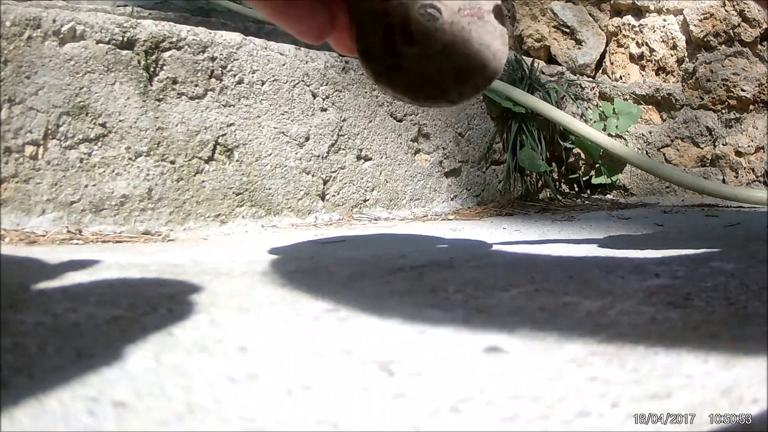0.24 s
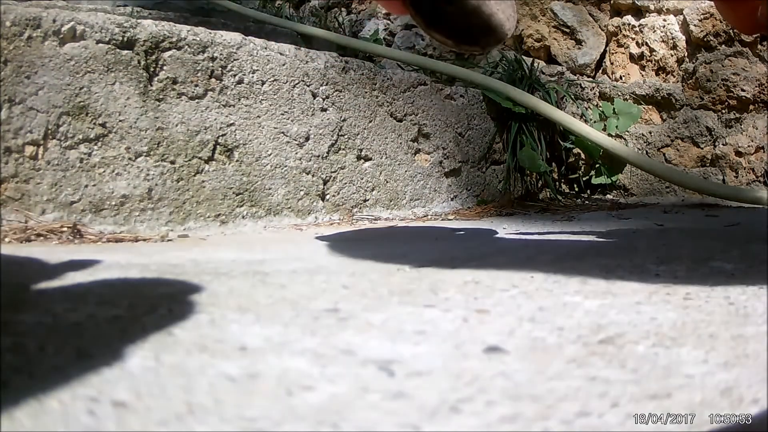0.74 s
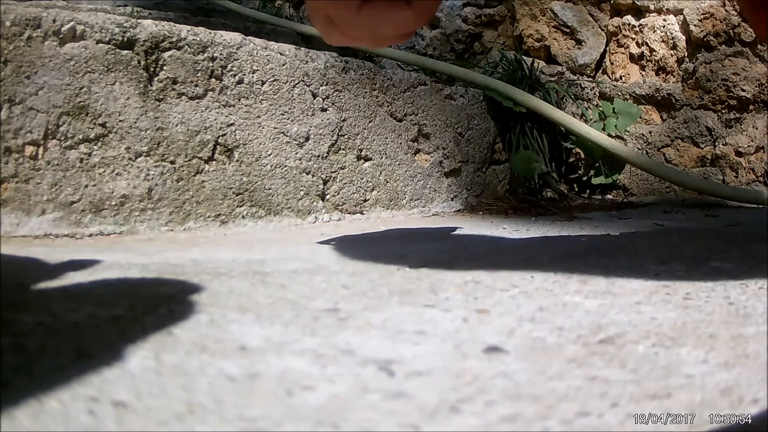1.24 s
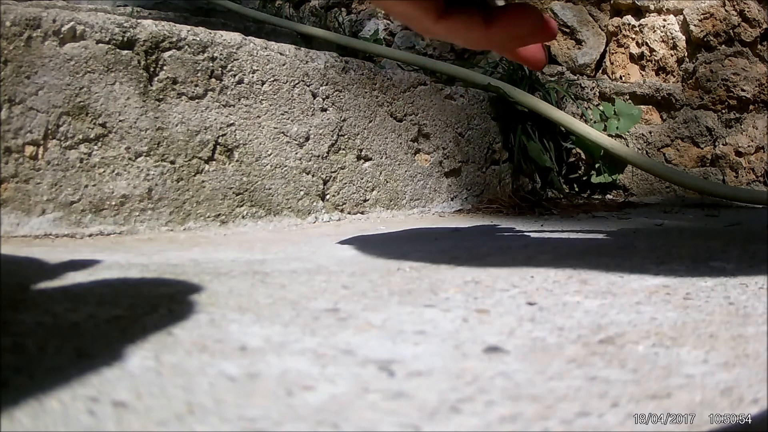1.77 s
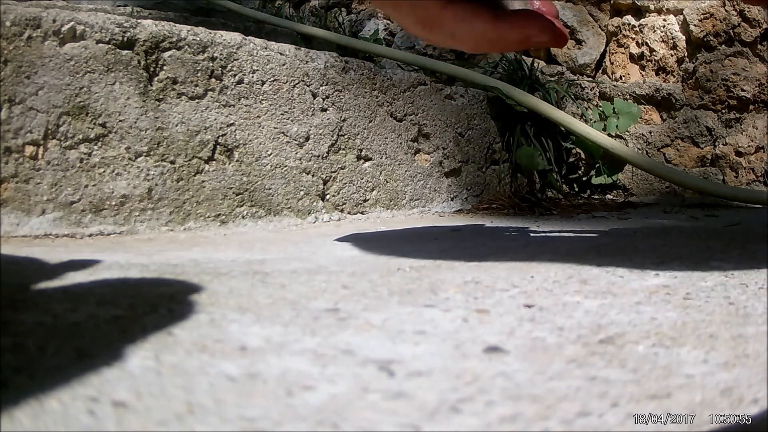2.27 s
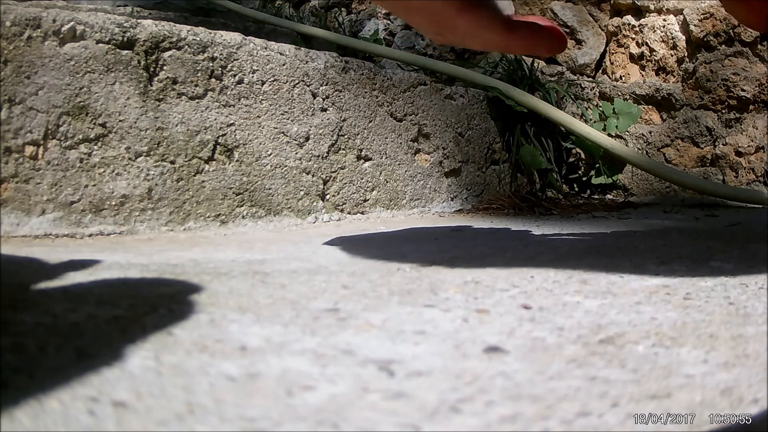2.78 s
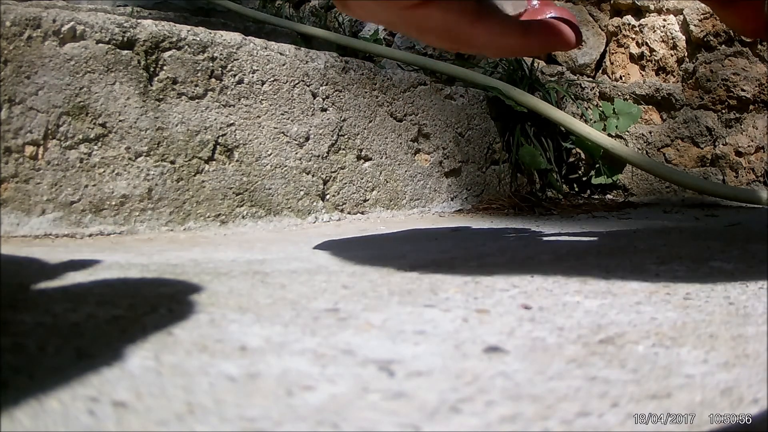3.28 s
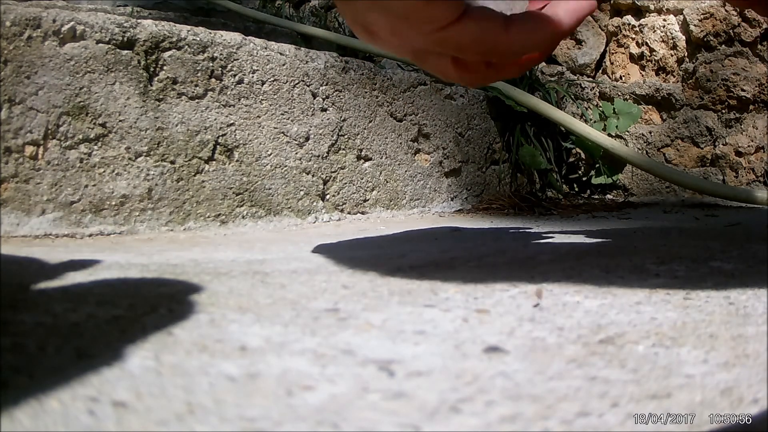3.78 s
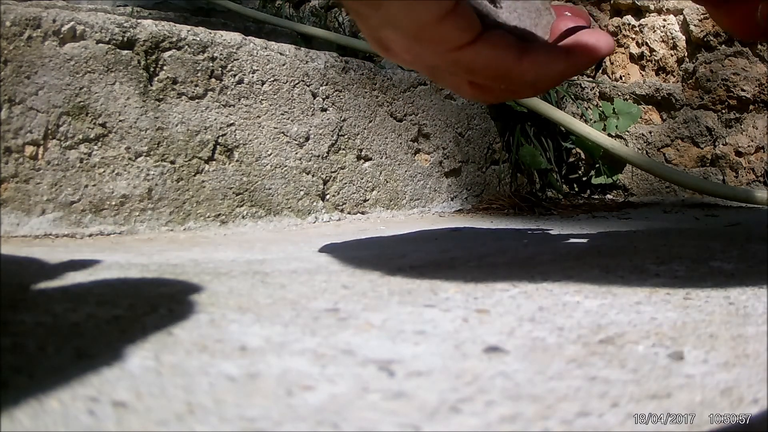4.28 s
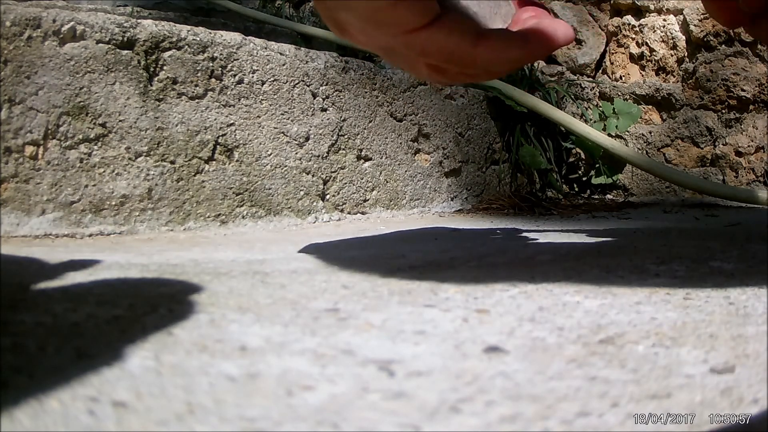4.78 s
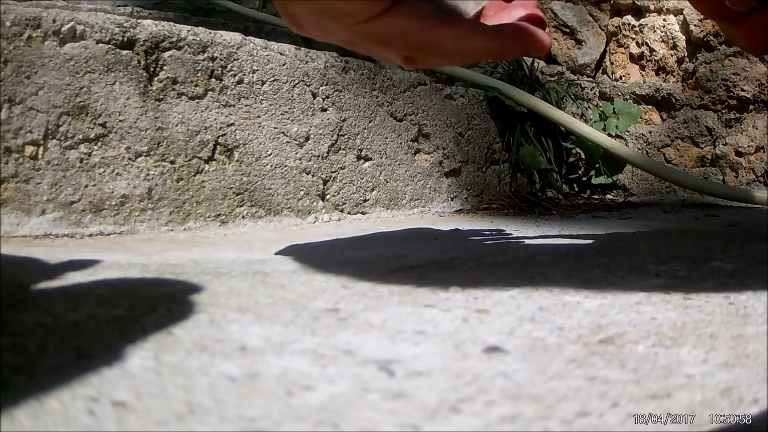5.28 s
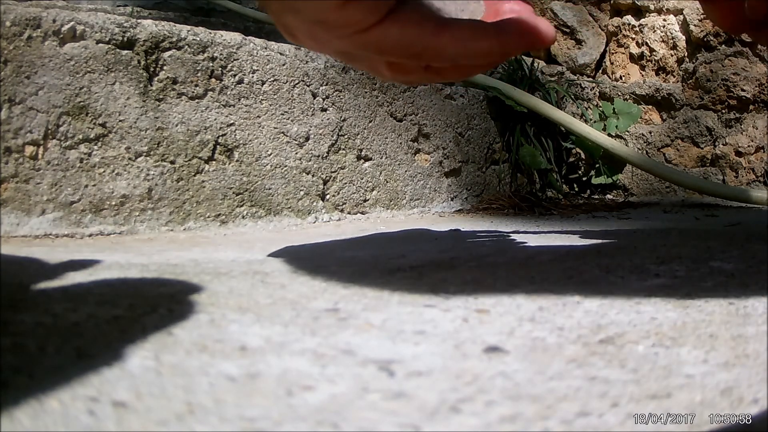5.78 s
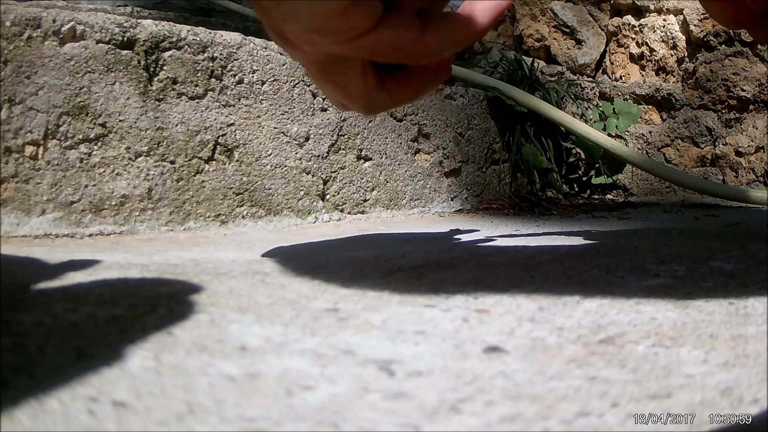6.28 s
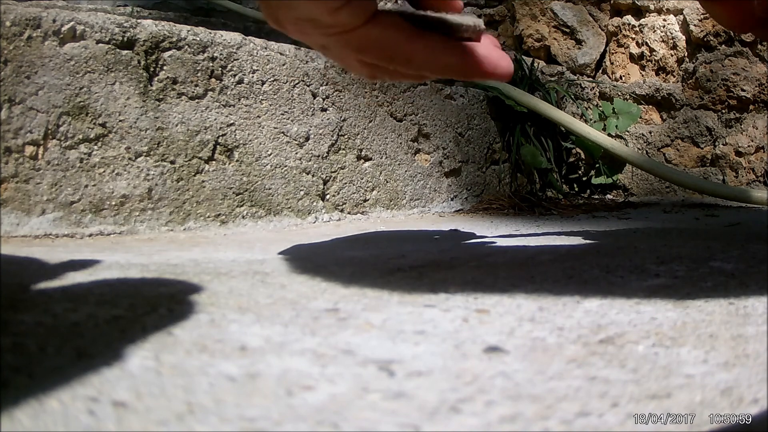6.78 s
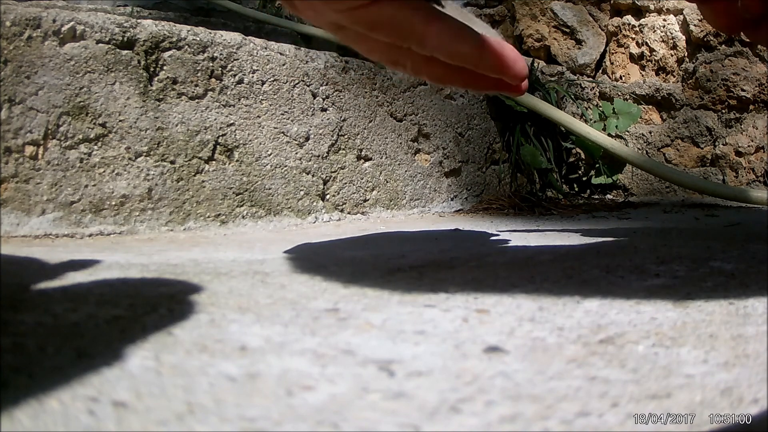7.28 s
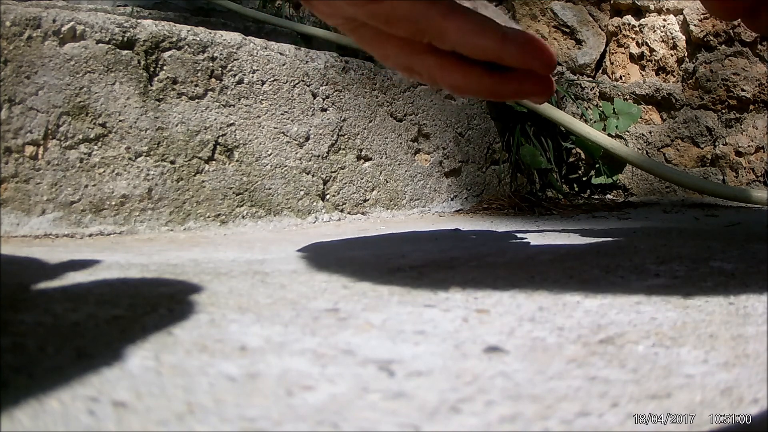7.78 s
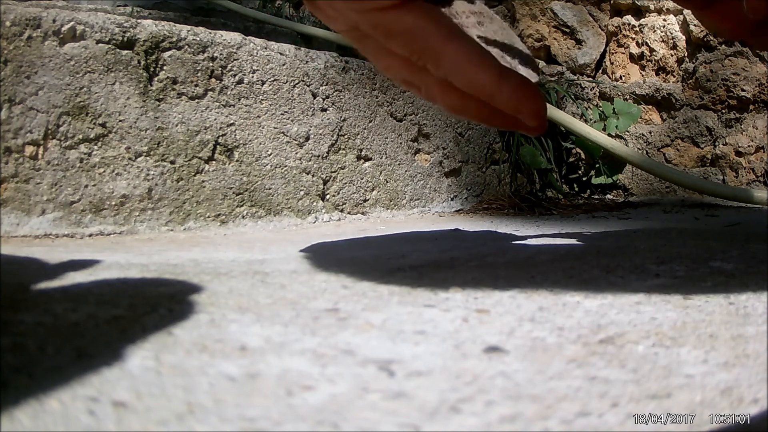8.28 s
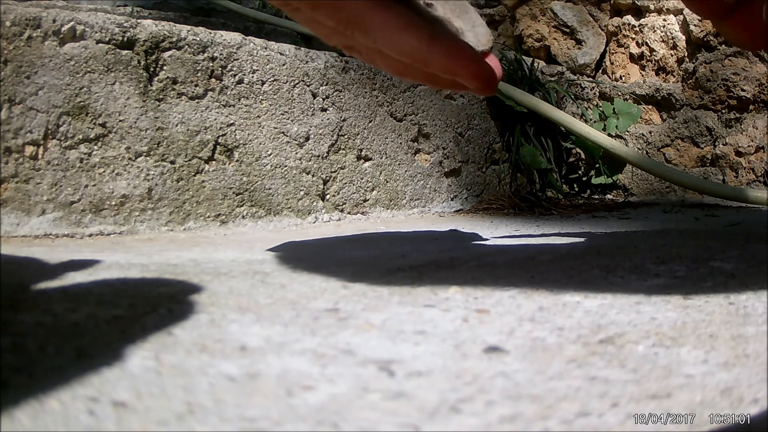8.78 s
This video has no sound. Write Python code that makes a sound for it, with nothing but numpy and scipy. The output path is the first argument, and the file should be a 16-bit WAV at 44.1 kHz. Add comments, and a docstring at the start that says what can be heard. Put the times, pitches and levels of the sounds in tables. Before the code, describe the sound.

Compressed air hisses through a hollow filter close up, surging in short rough bursts, with one brief pause and a tiny squeak.

```python
"""Air gun on a filter in a concrete yard

Outdoors, close to a small camera microphone, compressed air blows dust from a hand-held filter.
The jet hisses; each time the nozzle sweeps over an opening the hollow filter roars up briefly.
The trigger is let go once, with a few ticks in the quiet, and stray air buffets the microphone."""
import sys
import numpy as np
from scipy import signal
from scipy.io import wavfile
from scipy.ndimage import uniform_filter1d

SR = 44100
rng = np.random.default_rng(int(sys.argv[2]) if len(sys.argv) > 2 else 0)


def file_out(sig):
    """Save sig as 16-bit WAV at sys.argv[1]."""
    # one column per channel
    cols = np.atleast_2d(sig).T
    # limit, then scale
    lim = np.clip(cols, -1, 1)
    pcm = np.round(lim * 32767).astype(np.int16)
    wavfile.write(sys.argv[1], SR, pcm)


N = 398663
T = np.arange(N) / SR


def gain_of(db):
    """Decibels to amplitude."""
    return 10 ** (np.asarray(db) / 20)


def unit_rms(x):
    """Scale to an RMS of one."""
    return x / np.sqrt(np.mean(x ** 2) + 1e-20)


def add(mix, start_s, sound):
    """Mix a sound in at its start time."""
    part = mix[round(start_s * SR):][:len(sound)]
    part += sound[:len(part)]


def noise(colour, size=512, patchy_db=0., flicker_db=0., shift=None):
    """Unit-RMS noise of one colour, with drifting patches and a flicker shared by all frequencies."""
    hop = size // 4
    frames, hz = N // hop + 5, np.fft.rfftfreq(size, 1 / SR)[:, None]
    real, imag, patches = rng.standard_normal((frames, size // 2 + 1, 3)).T
    patches = unit_rms(uniform_filter1d(uniform_filter1d(patches, size=6, axis=0), size=12, axis=1))
    flicker = unit_rms(uniform_filter1d(rng.standard_normal(frames), size=3))
    if shift is not None:
        hz = hz / np.interp(np.arange(frames) * hop, np.arange(N), shift)
    colour_hz, colour_db = np.transpose(colour)
    level_db = np.interp(np.log(hz + 1), np.log(colour_hz + 1), colour_db, -90, -90)
    spectra = (real + 1j * imag) * gain_of(level_db + patchy_db * patches + flicker_db * flicker)
    return unit_rms(signal.istft(spectra, nperseg=size, noverlap=size - hop)[1][:N])


def yard():
    """The faint, mostly low ambience of the yard."""
    # ambience spectrum: freq_hz, density_db
    colour = [(24, -30), (40, -2), (125, 7), (269, -16), (1520, -14), (3560, -24), (6430, -20), (7500, -47),
              (9750, -53), (16500, -120)]
    return gain_of(-71.5) * noise(colour, size=1024, patchy_db=1.0)


def wall_echoes(near, t60_s=.16, delay_samples=300):
    """A short scatter of echoes from the stone wall and the ground."""
    t = T[delay_samples:5000]
    taps = rng.standard_normal(len(t)) * (rng.random(len(t)) < .05) * gain_of(-60 * t / t60_s)
    response = np.r_[np.zeros(delay_samples), taps / np.linalg.norm(taps)]
    return signal.oaconvolve(near, response)[:N]


def trigger_flow(shut_s=1.0317, open_s=1.261, fall_db_per_s=1900, rise_db_per_s=3900):
    """The flow dies away when the trigger shuts and leaps back when it opens."""
    falling_db = -fall_db_per_s * np.maximum(T - shut_s, 0)
    rising_db = -rise_db_per_s * np.maximum(open_s - T, 0)
    return gain_of(np.maximum(falling_db, rising_db))


def buffet():
    """Stray air on the microphone port: a lumpy rumble that swells around slaps of about one swing."""
    # strength of the stray air: time_s, level_db
    draught = [(0, -47), (.45, -58), (1.02, -60), (1.25, -46), (1.5, -58), (2.1, -65.5), (2.75, -60.5),
               (3.2, -64.5), (3.8, -55), (4.5, -60.5), (5.3, -50.5), (5.75, -55), (6.3, -53), (8.1, -60.5),
               (9.04, -57.5)]
    # rumble spectrum: freq_hz, density_db
    colour = [(8.8, -34), (15, -4.5), (59, 0), (200, -1.5), (260, -50), (440, -120)]
    # single slaps of air: middle_s, level_db, pitch_hz
    thumps = [(0.047, -38, 84), (.06, -31, 85), (.101, -30, 61), (.676, -38, 60), (0.831, -34, 54),
              (0.874, -48, 76), (1.365, -39, 95), (3.065, -29, 386), (4.728, -36, 105), (4.824, -36, 87),
              (5.116, -38, 61), (5.239, -37, 100), (5.529, -39, 104), (5.841, -31.5, 87.5), (5.99, -37, 79)]
    level, slaps = gain_of(np.interp(T, *np.transpose(draught))), np.zeros(N)
    for (middle_s, db, hz), phase in zip(thumps, rng.random(len(thumps))):
        span = slice(max(round((middle_s - .2) * SR), 0), round((middle_s + .2) * SR))
        cycles = hz * (T[span] - middle_s)
        level[span] += gain_of(db - 15) * np.exp(-(cycles / 1.5) ** 2)
        slaps[span] += gain_of(db) * np.exp(-(cycles / .51) ** 2) * np.sin(2 * np.pi * (cycles + phase))
    rumble = noise(colour, size=2048, patchy_db=3.5, flicker_db=3.0)
    return level * rumble * trigger_flow() + slaps


def ticks():
    """Trigger and grip tick, ringing the modes of the gun a little differently each time."""
    # ticks: start_s, level_db, bright_offset_db
    hits = [(1.053, -53, -12), (1.076, -68, 18), (1.088, -56, 4), (1.110, -63, -10), (1.125, -42, -9),
            (1.184, -56, -12), (1.189, -52, -12), (1.217, -53, 2), (1.228, -63, -4), (1.239, -80, 14)]
    # modes of the gun: pitch_hz, level_db, t60_s
    modes = [(1100, -4, .025), (1500, -7, .02), (2500, -6, .012), (3900, -4, .01), (4700, -3, .008),
             (5900, -4, .008), (7000, -7, .005)]
    out, t = np.zeros(N), T[:3000, None]
    hz, mode_db, t60_s = np.transpose(modes)
    bright = hz > 3000
    for start_s, db, bright_db in hits:
        detune = rng.uniform(.91, 1.17, len(modes))
        decays = gain_of(db + mode_db + bright * bright_db - 60 * t / t60_s)
        rings = decays * np.sin(2 * np.pi * hz * detune * t)
        add(out, start_s, rings.sum(axis=1))
    return out


def squeaks():
    """An opening closes under the jet: its whistle slides down as the gap narrows."""
    # whistles: start_s, length_s, first_hz, last_hz, peak_db
    whistles = [(6.596, .016, 1150, 560, -28), (8.392, .014, 1250, 640, -43)]
    out = np.zeros(N)
    for start_s, length_s, first_hz, last_hz, db in whistles:
        hz = np.geomspace(first_hz, last_hz, round(length_s * SR))
        tone = np.sin(2 * np.pi * np.cumsum(hz) / SR)
        add(out, start_s, gain_of(db) * np.hanning(len(hz)) ** .5 * tone)
    return out


def sweeps():
    """Crossing an opening adds power to roar, whoosh, spray and top hiss and bends the hollow's pitch."""
    # nozzle sweeps: middle_s, length_s, roar_db, spray_offset_db, pitch_factor
    crossings = [(0.098, 0.072, -28.5, -4, 1.03), (0.251, 0.056, -26.5, -4.5, 0.95),
                 (0.337, 0.048, -33, -1.5, 1.04), (0.45, .04, -37.5, 2.5, 1.03),
                 (0.67, 0.083, -39, -2.5, .99), (1.366, 0.12, -19, -36, 0.89),
                 (1.564, .077, -25.5, -17, 1.1), (1.651, 0.043, -26.5, -9.5, 1.12),
                 (1.886, 0.087, -27, -8.5, 1.1), (2.047, 0.039, -31.5, -16, 1.02),
                 (2.24, 0.094, -38, -1, .99), (2.427, 0.1, -35.5, -7, 0.97),
                 (2.588, 0.11, -37.5, -7.5, 0.96), (2.725, 0.11, -35.5, -6, 1.02),
                 (3.073, 0.039, -33.5, -8.5, 1), (3.498, 0.035, -25, -9.5, .99),
                 (3.622, 0.023, -28.5, -8.5, 0.99), (3.684, .018, -26, -9, 1.03),
                 (3.771, 0.019, -35, -6, .96), (3.821, .011, -28, -11, 1.06),
                 (3.88, .04, -39.5, -3.5, 1.04), (3.932, .03, -42, -12, 1.01),
                 (4.063, 0.034, -37, -9, 0.92), (4.19, 0.031, -32.3, -11, .97),
                 (4.325, 0.023, -30, -12.5, 0.96), (4.346, 0.025, -35, -5.5, 1.07),
                 (4.476, 0.062, -36.5, -7.5, .96), (4.622, 0.01, -41, -2.5, 1.16),
                 (4.693, 0.026, -39, -2.5, 1.16), (4.728, 0.012, -24.5, -10, .98),
                 (4.835, 0.036, -25, -8, 1.1), (4.976, 0.032, -27.5, -6, 1.14),
                 (5.113, 0.046, -27, -7, 1.06), (5.261, 0.042, -26, -7, 1.02),
                 (5.346, 0.012, -34.5, -4.5, 1.17), (5.379, 0.018, -28, -8, 0.75),
                 (5.406, 0.036, -29, -5, 1.18), (5.489, 0.041, -29, -12, 1), (5.547, 0.045, -28.5, -5, 1.1),
                 (5.628, 0.02, -27.5, -9.5, 1.04), (5.694, 0.031, -30, -4.5, 1.12),
                 (5.839, .027, -27, -6, 1.13), (5.987, .033, -26, -6, 1.04), (6.139, 0.055, -31, -7, 1.1),
                 (6.293, 0.055, -20.5, -14, 1.06), (6.454, 0.065, -23, -13.5, 1.2),
                 (6.591, 0.022, -26.5, -25, 0.92), (6.68, 0.072, -35, -12, 0.92),
                 (6.806, 0.045, -30.5, -6.5, 0.98), (6.913, .023, -30.5, -7, 0.97),
                 (6.948, 0.017, -28.5, -6, .96), (7.051, 0.03, -30.5, -6, 1.09),
                 (7.104, 0.018, -28, -5.5, 1.06), (7.138, 0.046, -37, -8, 1.02),
                 (7.196, 0.011, -36, -5, 0.9), (7.21, 0.025, -37, -4.5, 1.08),
                 (7.257, 0.0095, -26, -7.5, 0.88), (7.326, .009, -33.5, -3.5, 0.83),
                 (7.403, 0.015, -26, -6.5, 1), (7.445, 0.077, -32.5, -12, 0.93),
                 (7.491, 0.012, -26.5, -6, 0.9), (7.553, .021, -34.5, -1.5, 0.95),
                 (7.58, 0.061, -34, -13, 1.03), (7.63, 0.012, -28.5, -6, 1),
                 (7.725, 0.064, -36, -8.5, 1.02), (7.822, 0.041, -36.5, -7, 1.13),
                 (7.894, 0.069, -35.5, -12, 0.98), (8.048, .061, -33, -15, 1.01),
                 (8.127, .05, -35.5, -5.5, 1.03), (8.195, 0.041, -38.5, -24, 1),
                 (8.355, .067, -36, -5.5, 1), (8.393, 0.013, -35, -15, .8), (8.482, .017, -40, -3.5, 0.98),
                 (8.613, 0.095, -47, 0.5, 0.97), (8.708, 0.046, -38.5, -10, 1.1),
                 (8.977, .031, -33.5, -3, 1.02)]
    power, pitch = np.zeros((4, N)), np.ones(N)
    for middle_s, length_s, roar_db, spray_db, factor in crossings:
        first, last = (round((middle_s + side * length_s) * SR) for side in (-2, 2))
        span = slice(max(first, 0), last)
        bell = 2. ** (-abs(2 * (T[span] - middle_s) / length_s) ** 2.6)
        # against the roar: loud sweeps whoosh more, top hiss outruns spray, both grow with pitch
        whoosh_db = -13 + .99 * (roar_db + 24) + 27 * (factor - 1)
        top_db = -3.5 + 1.5 * spray_db + 7 * (factor - 1)
        peaks = gain_of(roar_db + np.array([0, whoosh_db, spray_db, top_db]))
        power[:, span] += (peaks[:, None] * bell) ** 2
        pitch[span] *= factor ** bell
    return power, pitch


def jet():
    """Turbulence makes the hollow filter roar, with a thrum below and fizz and hiss above."""
    # the jet between sweeps: time_s, roar_db, hiss_db, top_hiss_db
    levels = [(0, -35, -35.5, -40), (.17, -38.5, -40, -47), (.25, -29, -39, -44), (.44, -30, -36.5, -45),
              (.52, -39, -44.5, -47), (.8, -41.5, -42.5, -46), (1.02, -36.5, -42.5, -51.5),
              (1.262, -26, -40.5, -48), (1.5, -27, -39, -45), (1.8, -38, -41, -46), (2.1, -35, -40, -47.5),
              (2.5, -46, -56, -54.5), (2.7, -41.5, -45, -47), (3.0, -39, -47.5, -47.5),
              (3.3, -42.5, -51, -53), (3.45, -40.5, -42.5, -46), (3.87, -41.5, -44, -49.5),
              (4.26, -43.5, -47.5, -50), (4.85, -40.5, -49, -49.5), (5.04, -36.5, -44, -46.5),
              (5.8, -39.5, -46, -48), (6.15, -33, -40.5, -47), (6.55, -32.5, -45.5, -46.5),
              (6.75, -40.5, -46, -46), (6.98, -33, -39, -46), (7.29, -40, -44.5, -46),
              (7.52, -42.5, -48, -50.5), (7.67, -40, -42.5, -46.5), (7.78, -43, -44, -48.5),
              (7.96, -43, -48, -52.5), (8.16, -44.5, -46.5, -49.5), (8.28, -41, -46, -49),
              (8.55, -46, -53, -55), (8.7, -45, -48, -47.5), (8.94, -45, -48.5, -51.5),
              (9.04, -51, -59, -64)]
    # spectra of the rushing air, low to high: freq_hz, density_db
    thrum = [(110, -55), (150, -14), (280, -10), (420, -7.5), (600, -4), (850, -5.5), (1100, -44)]
    whoosh = [(110, -40), (170, -18), (330, -15), (520, -3), (750, 0), (1000, -2), (1250, -30)]
    roar = [(500, -14), (800, -15.5), (1050, -5.5), (1220, -4.5), (1540, 1.5), (1740, -8.5), (1950, -2.5),
            (2300, -10), (2800, -16.5), (3300, -17.5)]
    fizz = [(2200, -30), (2700, -9), (3300, -12), (3800, -2), (4400, 0), (4900, -4), (5500, -12),
            (6200, -30)]
    spray = [(2200, -9), (2700, -14.5), (3300, -5.5), (4000, 0), (5500, -6), (6400, -0.5), (7300, -8),
             (8200, -11)]
    hiss = [(5000, -13.5), (5700, -9), (6200, -2.5), (6600, -1), (7200, -7.5), (7700, -12), (8200, -19)]
    top = [(7800, -15), (8300, -5), (9200, -1.5), (11500, -2.5), (12300, -5), (13100, -15), (14200, -13.5),
           (15100, -20.5), (15700, -30)]
    time_s, *columns = np.transpose(levels)
    roar_db, hiss_db, top_db = (np.interp(T, time_s, column) for column in columns)
    # thrum and fizz follow as roar and hiss stray from their usual levels
    roar_rise_db, hiss_rise_db = roar_db + 39, hiss_db + 45
    thrum_db = -49 + .45 * roar_rise_db + .09 * hiss_rise_db
    fizz_db = -47 + .3 * roar_rise_db + .96 * hiss_rise_db
    (swept_roar, swept_whoosh, swept_spray, swept_top), pitch = sweeps()
    layers = [  # power, sound
        (gain_of(top_db) ** 2 + swept_top, noise(top, patchy_db=.7, flicker_db=1.8)),
        (gain_of(roar_db) ** 2 + swept_roar, noise(roar, patchy_db=1.5, flicker_db=-.5, shift=pitch)),
        (gain_of(thrum_db) ** 2, noise(thrum, size=1024, patchy_db=.9, flicker_db=2.2)),
        (swept_whoosh, noise(whoosh, patchy_db=1.2, flicker_db=.8, shift=pitch)),
        (gain_of(fizz_db) ** 2, noise(fizz, patchy_db=2.5, flicker_db=1.15)),
        (gain_of(hiss_db) ** 2, noise(hiss, patchy_db=2.5, flicker_db=.9)),
        (swept_spray, noise(spray, patchy_db=2.5, flicker_db=.6))]
    air = sum(np.sqrt(power) * sound for power, sound in layers)
    # gusts shake every layer alike
    gusts = uniform_filter1d(uniform_filter1d(rng.standard_normal(N), size=600), size=600)
    return trigger_flow() * gain_of(.51 * unit_rms(gusts)) * air


def scene():
    """Gun and filter up close, the yard and its echoes behind, stray air on the microphone; mono."""
    near = jet() + squeaks() + ticks()
    behind = yard() + gain_of(-21) * wall_echoes(near)
    return (near + behind + buffet())[None]


def record(dry):
    """The small microphone squashes the loudest peaks. Apart from that, two narrow gaps cut into the treble,
    which ends at a sharp edge."""
    # dead spots in the treble: centre_hz, half_width_hz, depth_db
    gaps = [(7960, 170, 40), (13400, 90, 33)]
    ceiling, edge_hz = .2, 15520
    squashed = ceiling * np.tanh(dry / ceiling)
    hz = np.linspace(0, SR / 2, 2049)
    cut_db = sum(depth * np.exp(-abs(hz - centre) / width) for centre, width, depth in gaps)
    notches = signal.firwin2(1023, hz, gain_of(-cut_db), fs=SR)
    lowpass = signal.firwin(511, edge_hz, window=("kaiser", 9), fs=SR)
    return signal.oaconvolve(squashed, np.convolve(notches, lowpass)[None], "same")


dry = scene()
out = record(dry)
file_out(out)
```